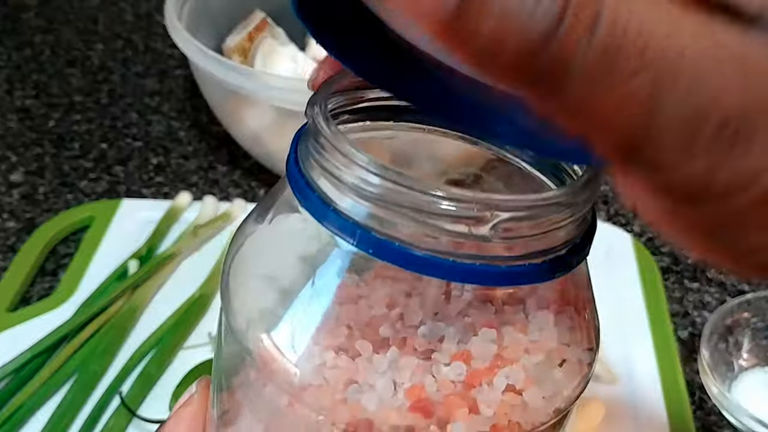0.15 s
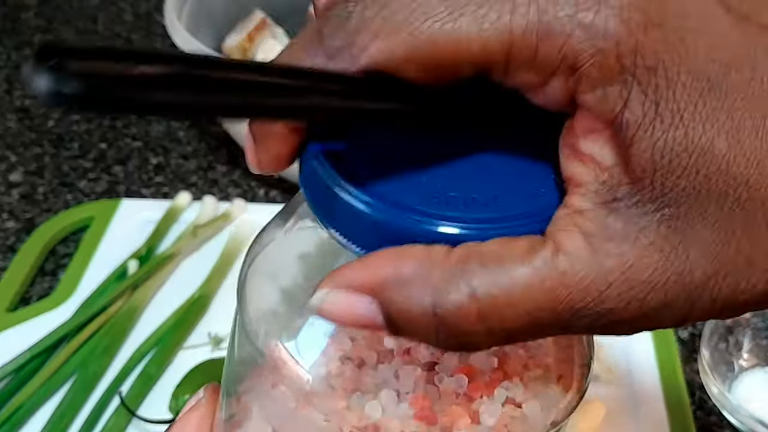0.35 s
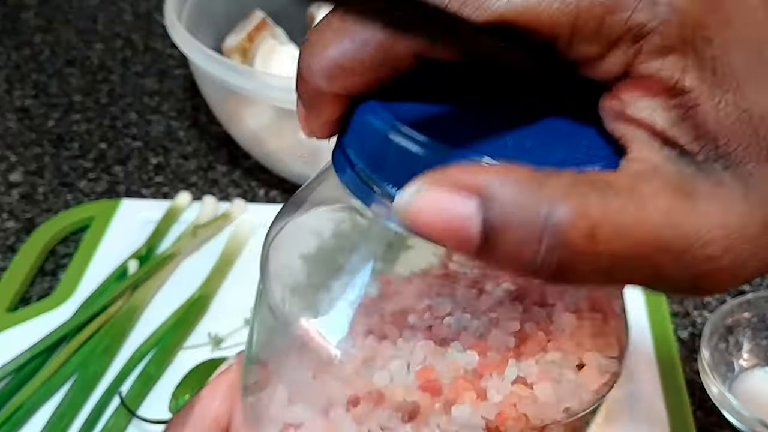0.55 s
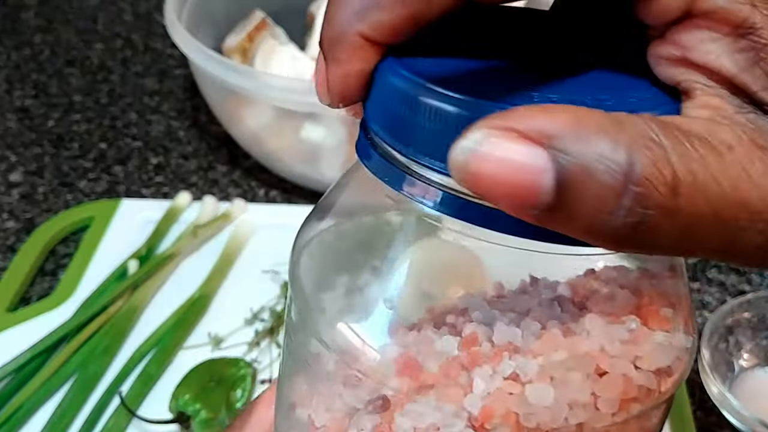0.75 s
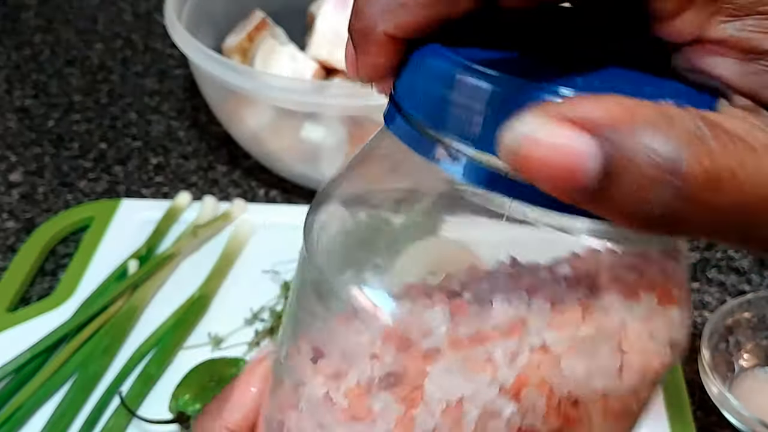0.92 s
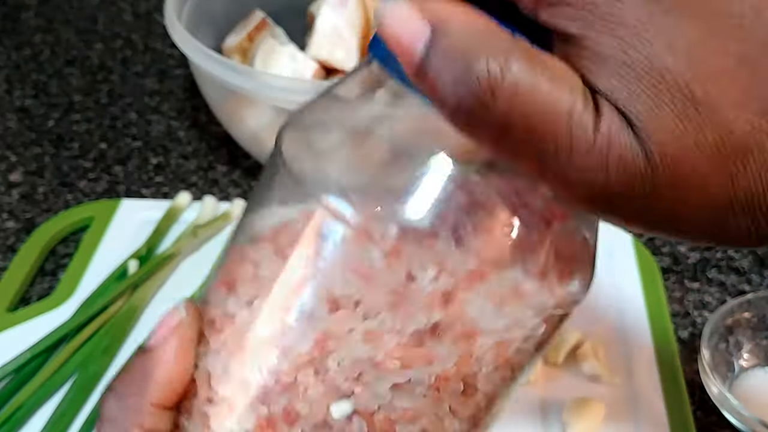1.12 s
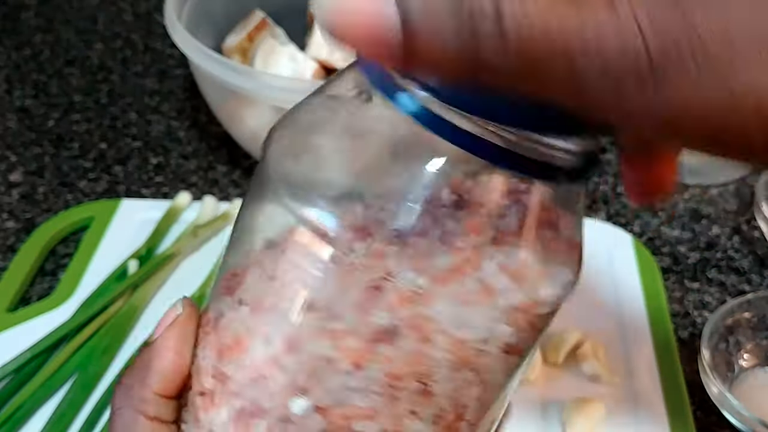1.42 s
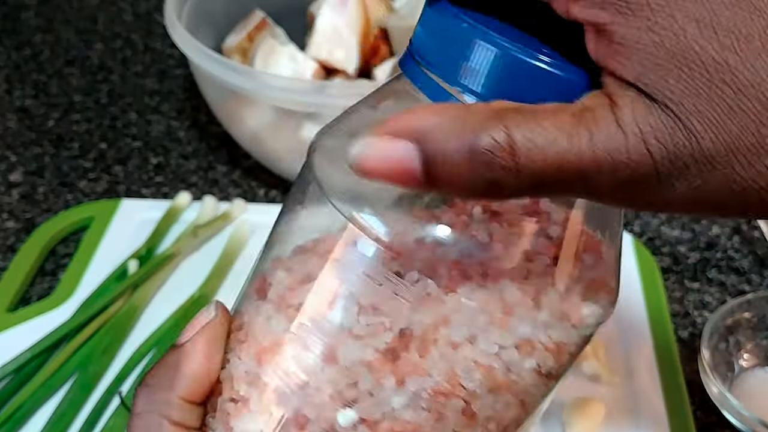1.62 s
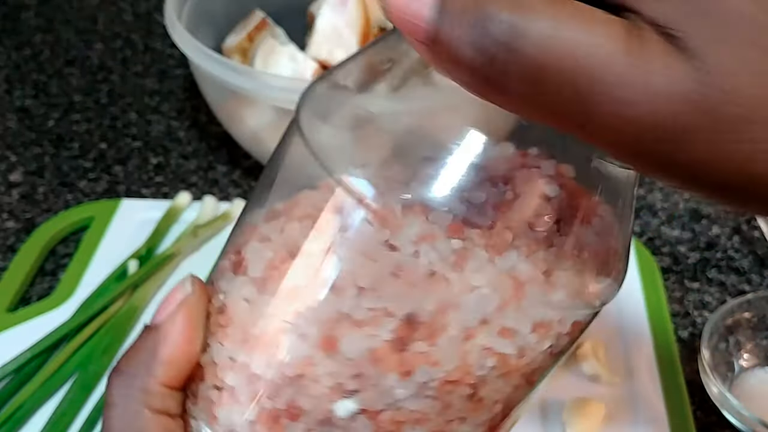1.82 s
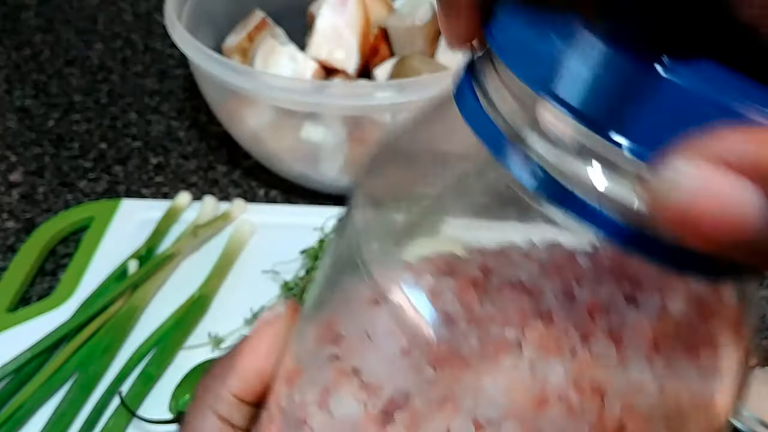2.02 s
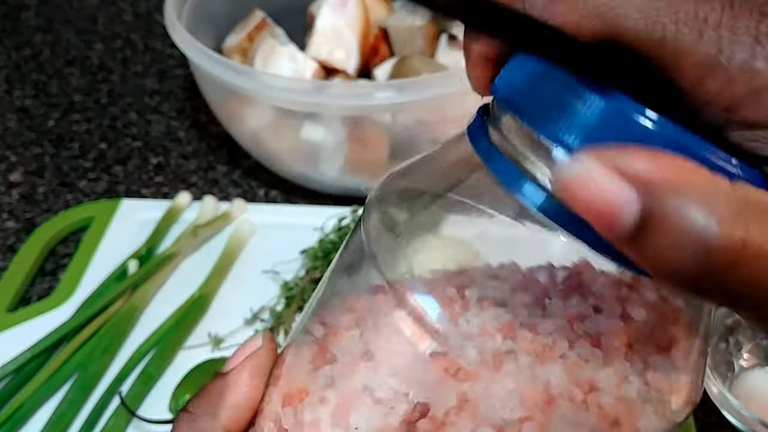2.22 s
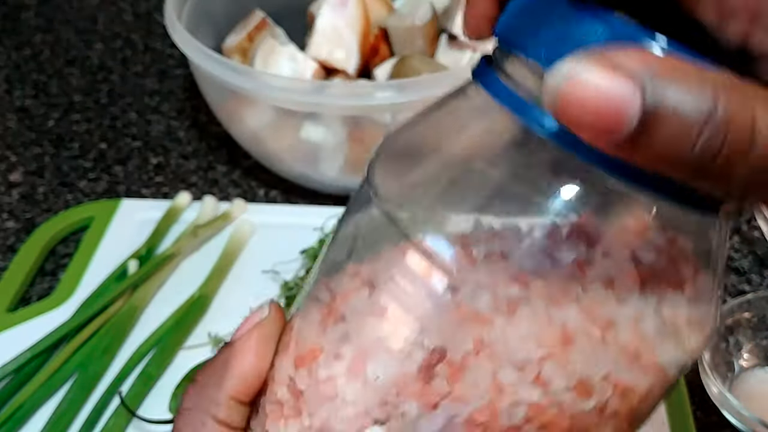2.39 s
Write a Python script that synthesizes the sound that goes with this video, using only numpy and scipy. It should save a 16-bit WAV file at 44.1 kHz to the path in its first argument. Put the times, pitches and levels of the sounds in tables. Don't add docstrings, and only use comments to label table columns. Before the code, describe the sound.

A plastic lid rocks and knocks onto a jar of coarse salt, lightly at first, then with harder hollow clacks and thread chatter as it is twisted; crystals tick and slide. Close phone microphone, small kitchen, low hum.

```python
import sys
import numpy as np
from scipy import signal
from scipy.fft import rfft, irfft, next_fast_len
from scipy.io import wavfile
from scipy.ndimage import uniform_filter1d, map_coordinates

SR = 44100
rng = np.random.default_rng(int(sys.argv[2]) if len(sys.argv) > 2 else 0)


def voltage_ratio(level):
    return 10 ** (np.asarray(level, float) / 20)


def waveform_to_disk(signal):
    frames = np.transpose(np.atleast_2d(signal))
    scaled = np.clip(frames, -1, 1) * 32767
    samples = np.round(scaled).astype(np.int16)
    wavfile.write(sys.argv[1], SR, samples)


N = 112454


def unit(x):
    return x / np.sqrt(np.mean(x ** 2) + 1e-20)


def along(points, hz):
    f, v = np.transpose(points)
    return np.interp(np.log(hz + 1), np.log(f + 1), v)


def wobble(rate_hz):
    knots = rng.standard_normal(int(N * rate_hz / SR) + 4)
    return map_coordinates(knots, [np.arange(N) * rate_hz / SR])


def filtered(x, response):
    n = x.shape[-1]
    m = next_fast_len(n + 8192)
    return irfft(rfft(x, m) * response(np.fft.rfftfreq(m, 1 / SR)), m)[..., :n]


def peak(f, hz, width_hz):
    return 1j * f * width_hz / (hz * hz - f * f + 1j * f * width_hz)


# f/Hz, correlation [-1..1]
LIKENESS = [(40, 0.8), (150, 0.88), (400, 0.98), (800, 0.057), (2500, 0.19), (8000, 0.042)]


def spread(pair, colour):
    def mid_side(hz):
        angle = np.arccos(np.clip(along(LIKENESS, hz), -1, 1)) / 2
        return voltage_ratio(along(colour, hz)) * [np.cos(angle), np.sin(angle)]

    mid, side = filtered(pair, mid_side)
    return np.array([mid + side, mid - side])


# f/Hz, level/dB [per Hz]
RUMBLE_COLOUR = [(15, -69), (25, -10.5), (108, -5.5), (181, -9.5), (214, -2), (281, -11.5), (453, -11),
                 (785, -26), (2000, -40), (2600, -77), (4400, -120)]


def hum():
    t = np.arange(N) / SR
    rumble = unit(spread(rng.standard_normal((2, N)), RUMBLE_COLOUR)) * voltage_ratio(-43 + 2.2 * wobble(8.4))
    air = filtered(rng.standard_normal((2, N)), lambda f: f > 11500) * voltage_ratio(-61 + 2.5 * wobble(9))
    hiss = voltage_ratio(-84) * rng.standard_normal((2, N))
    mains = voltage_ratio(-47.5 + 1.3 * wobble(13.8)) * np.sin(2 * np.pi * 120 * t)
    return rumble + air + hiss + mains


# f/Hz, t60/s
KITCHEN_T60 = [(150, 0.21), (1000, 0.28), (4000, 0.23), (10000, 0.22)]


def kitchen(x):
    wall_delay_s, room_low_db = 0.004, 2
    late, hop = round(wall_delay_s * SR), SR // 8
    out = np.zeros((2, N + 2 * SR))
    for start in range(0, N, hop):
        hz, t, z = signal.stft(rng.standard_normal((2, SR // 2)), SR, nperseg=256)
        decay = voltage_ratio(-60 * t / along(KITCHEN_T60, hz)[:, None])
        tail = signal.istft(z * decay, SR, nperseg=256)[1]
        tail = spread(tail, [(500, room_low_db), (1500, 0)])
        tail = tail / np.linalg.norm(tail[0])
        wet = signal.fftconvolve(x[None, start:start + hop], tail, axes=1)
        out[:, start + late:][:, :wet.shape[1]] += wet
    return out[:, :N]


# t/s, level/dB
FLOW_LEVEL = [(0, -59), (.12, -46), (.19, -50), (.22, -79), (.5, -65), (.56, -53.5), (.64, -44.5),
              (.81, -58.5), (.9, -45), (1.15, -36), (1.3, -57.5), (1.43, -43.5), (1.6, -38), (1.67, -59.5),
              (2.22, -59), (2.3, -64.5), (2.37, -61), (2.44, -65.5)]
# t/s, length/s, level/dB
HEAP_SLIDES = [
    (0.154, 0.025, -55),
    (0.725, 0.054, -38.5),
    (1.323, 0.017, -50),
    (1.497, 0.051, -25),
    (2.465, 0.052, -46),
]
# f/Hz, level/dB
SALT_SPECTRUM = [(500, -17), (1500, -11), (3000, 1), (5000, 6), (9000, -3), (12000, -3), (16000, 2)]


def salt():
    grains_per_s, grain_spread_db, touch_s = 720, 3, 0.00026
    edge_s, fall_s, sag_db_per_s = 0.011, 0.0023, 74
    t = np.arange(N) / SR
    flow = voltage_ratio(np.interp(t, *np.transpose(FLOW_LEVEL)) - 1 + 3 * wobble(24.24))
    for s, length_s, db in HEAP_SLIDES:
        level = voltage_ratio(db - sag_db_per_s * np.clip(t - s, 0, 1) + 2.5 * wobble(130))
        onset = np.clip((t - s) / edge_s, 0, 1)
        fall = np.exp(-np.clip(t - s - length_s, 0, 1) / fall_s)
        flow = flow + level * onset * fall
    chance, size = rng.random(N), rng.exponential(size=N)
    hits = (chance < grains_per_s / SR) * voltage_ratio(grain_spread_db * size)
    touch = signal.fftconvolve(hits, np.exp(-np.arange(200) / SR / touch_s))[:N]
    hush = voltage_ratio(1) * rng.standard_normal((2, N))
    grains = unit(touch * rng.standard_normal((2, N))) + hush
    return flow * unit(spread(grains, SALT_SPECTRUM))


# t/s, peak level/dB, centre f/Hz, t60/s
WALL_TICKS = [(.0065, -29, 4960, .02), (.028, -42, 7900, 0.019), (0.0645, -30.5, 7000, 0.019),
              (.0848, -31.5, 6000, .02), (0.0968, -31.5, 3960, .04), (.1045, -32, 6030, .03),
              (.18, -29.5, 8040, 0.018), (.3147, -33, 3000, 0.019), (0.537, -42.5, 6250, 0.048),
              (0.6709, -22, 6900, .012), (0.7036, -32.5, 5000, 0.041), (0.7441, -26.5, 5470, 0.036),
              (.763, -27, 4540, .05), (0.8315, -39, 5000, .015), (0.845, -30, 1500, 0.022),
              (1.0338, -23, 3000, 0.014), (1.092, -15, 1000, 0.018), (1.149, -26, 4040, .015),
              (1.1643, -20, 2170, 0.018), (1.1724, -26.5, 1400, 0.0087), (1.332, -27, 1500, 0.0086),
              (1.3435, -22, 4700, 0.0069), (1.373, -31, 1500, .01), (1.74, -28, 2220, 0.045),
              (1.3985, -27, 2200, 0.013), (1.432, -27.5, 1790, 0.025), (1.503, -20, 6940, 0.034),
              (1.5105, -10.5, 8400, 0.033), (1.5185, -14, 7000, 0.027), (1.529, -22, 7000, .03),
              (1.539, -23, 5940, 0.016), (1.547, -36, 4950, 0.018), (1.566, -28, 4960, 0.023),
              (1.579, -34, 7000, .02), (1.6978, -33, 3000, .02), (1.703, -48, 4000, 0.028),
              (1.8482, -21.5, 1500, 0.029), (1.8587, 2.5, 2010, 0.0085), (1.9886, -4.5, 2370, 0.022),
              (1.9931, -7.5, 4100, 0.01), (2.1679, -15.5, 1209, 0.035), (2.27, -53, 5500, .05),
              (2.3355, -45, 7000, 0.046), (2.375, -57, 7430, 0.065)]


def ticks():
    width, rise_s, air_db = 0.95, 0.00042, -11
    out, t = np.zeros((2, N + SR)), np.arange(SR // 8) / SR
    for s, db, hz, t60 in WALL_TICKS:
        def spot(f):
            return peak(f, hz, width * hz) ** 2 + voltage_ratio(air_db) * np.clip(f / hz - 1, 0, 1)

        envelope = voltage_ratio(-60 * t / t60) * (1 - np.exp(-t / rise_s))
        crack = envelope * filtered(rng.standard_normal((2, len(t))), spot)
        out[:, round(s * SR):][:, :len(t)] += voltage_ratio(db - 1.0) * crack / np.abs(crack).max()
    return spread(out[:, :N], [(100, 0), (16000, 0)])


# t/s, peak level/dB, tilt [dB/octave], t60/s
SNAP_EVENTS = [(0.0, -32, 7, 0.11), (0.0648, -42, 6.5, 0.026), (0.135, -32, -3.5, 0.14),
               (0.2534, -33.5, -3, 0.044), (0.3044, -26.5, -1.5, 0.16), (0.3495, -15, 1.5, 0.066),
               (0.596, -37.5, 3.5, 0.24), (0.671, -38, 8, 0.071), (0.835, -31, 6.5, 0.061),
               (0.8508, -17.5, 4, 0.047), (0.9804, -31.5, 0.2, 0.26), (1.0237, -6, 0.5, 0.081),
               (1.061, -5.5, -1, 0.039), (1.1718, -18, -10.5, 0.017), (1.1813, -10, 0.1, 0.04),
               (1.2753, -20.5, -3, 0.046), (1.3326, -26, -0.5, 0.1), (1.3726, -23, -5.2, 0.067),
               (1.4536, -26, 2.5, 0.056), (1.4763, -22.5, 4, 0.057), (1.6027, -39, 1.5, 0.047),
               (1.7376, -30, -8.5, 0.11), (1.855, -11.5, 4, 0.093), (1.984, -7.5, 0.5, 0.2),
               (2.0848, -20, -0.5, 0.1), (2.167, -6.5, -6, 0.023), (2.4047, -43, -8.5, 0.065),
               (2.4817, -31, 1.5, 0.3)]
# f/Hz, level/dB
SNAP_SPECTRUM = [(300, -3), (600, -0.5), (1000, 8), (1500, 8), (3000, 9.5), (7000, 3.5), (11000, 0),
                 (16000, 5.5)]


def snaps():
    snap_db, rise_s, slip_swing_db, tilt_around_hz = -10.5, 0.00075, 3, 3000
    out, t = np.zeros((2, N + SR)), np.arange(SR // 4) / SR
    for s, db, tilt_db, t60 in SNAP_EVENTS:
        swing = unit(uniform_filter1d(rng.standard_normal(len(t)), size=40))
        slips = voltage_ratio(slip_swing_db * swing) * rng.standard_normal((2, len(t)))
        burst = slips * voltage_ratio(db + snap_db - 60 * t / t60) * (1 - np.exp(-t / rise_s)) ** 2
        tilted = filtered(burst, lambda f: voltage_ratio(tilt_db * np.log2(np.clip(f, 600, 9000) / tilt_around_hz)))
        out[:, round(s * SR):][:, :len(t)] += tilted
    return spread(out[:, :N], SNAP_SPECTRUM)


PING_TIMES = [.005, .098, 1.165, 1.2755, 1.335, 1.373, 1.398, 1.432, 1.477, 1.855, 1.856, 1.857, 1.986,
              2.484, 1.859, .006]
PING_PITCHES = [2550, 2540, 2330, 2320, 2330, 1150, 1520, 1550, 1750, 336, 92, 970, 608, 4180, 2105, 4800]
# peak level/dB, t60/s
PING_DECAYS = [(-30.5, 0.023), (-31.5, 0.015), (-26, 0.018), (-17.5, 0.033), (-33.5, 0.25), (-29, 0.052),
               (-26, .015), (-32, 0.021), (-33, 0.018), (-13.5, 0.15), (-15, 0.085), (-10, 0.024),
               (-12, 0.084), (-32.5, 0.14), (-24, 0.18), (-23.5, 0.013)]


def pings():
    rise_s, drift_rad_per_khz = 0.00075, 0.05
    out, t = np.zeros(N + SR), np.arange(SR // 4) / SR
    for s, hz, (db, t60) in zip(PING_TIMES, PING_PITCHES, PING_DECAYS):
        drift = drift_rad_per_khz * hz / 1000 * np.cumsum(rng.standard_normal(len(t)))
        envelope = voltage_ratio(db - 60 * t / t60) * (1 - np.exp(-t / rise_s))
        out[round(s * SR):][:len(t)] += envelope * np.sin(2 * np.pi * hz * t + drift)
    return out[:N]


# t/s, length/s, level/dB, first f/Hz, last f/Hz
AIR_PUFFS = [
    (.135, 0.012, -24, 418, 387),
    (.147, 0.0078, -23, 428, 413),
    (0.17, 0.035, -35.5, 390, 400),
    (0.256, 0.017, -23, 360, 325),
    (0.278, 0.032, -26.5, 310, 347),
    (0.307, 0.021, -20.5, 312, 295),
    (0.33, 0.019, -23.5, 273, 255),
]


def puffs():
    overtone_db, hush_db, swell_power = -18, -16, 0.6
    out, t = np.zeros(N + SR), np.arange(SR // 4) / SR
    for s, length_s, db, first_hz, last_hz in AIR_PUFFS:
        u = np.clip(t / length_s, 0, 1)
        noise = rng.standard_normal(len(t))
        hush = unit(filtered(noise, lambda f: peak(f, 1.18 * first_hz, 0.86 * first_hz) ** 2))
        phase = 2 * np.pi * np.cumsum(first_hz + (last_hz - first_hz) * u) / SR
        tone = np.sin(phase) + voltage_ratio(overtone_db) * np.sin(2 * phase) + voltage_ratio(hush_db) * hush
        swell = np.abs(np.sin(np.pi * u)) ** swell_power * (u < 1)
        out[round(s * SR):][:len(t)] += voltage_ratio(db) * swell * tone
    return out[:N]


def rocking():
    return (puffs() + pings()) * voltage_ratio(1.5 * wobble(150))


# t/s, peak level/dB, air f/Hz, t60/s
LID_KNOCKS = [(0.353, -16.5, 248, 0.071), (0.356, -20.5, 328, 0.068), (0.592, -20.5, 280, 0.037),
              (0.847, -11.5, 363, 0.035), (0.854, -13.5, 371, 0.025), (1.0229, -2.5, 441, 0.03),
              (1.039, -19.5, 493, 0.071), (1.06, -12.5, 357, 0.035), (1.088, -23.5, 470, 0.025),
              (1.171, -10, 540, 0.012), (1.182, -15.5, 260, 0.045), (1.207, -25, 508, 0.023),
              (1.3296, -17.5, 395, 0.04), (1.348, -14.5, 322, 0.021), (1.37, -7, 306, 0.012),
              (1.735, -18.5, 290, 0.051), (1.852, -11.5, 353, 0.063), (1.983, -1, 346, 0.041),
              (1.991, -20, 302, 0.033), (2.014, -22.5, 324, 0.083), (2.084, -11, 258, 0.022),
              (2.102, -17, 246, 0.027), (2.164, -1, 322, 0.023), (2.184, -20, 317, 0.057),
              (2.403, -28.5, 233, 0.072)]
# f/Hz, width/Hz, level/dB
WALL_MODES = [(95, 60, -7.5), (201, 170, -7), (623, 27, -15), (950, 1800, -17), (1450, 300, -79)]


def knocks():
    knock_db, wall_db, thud_db = -2, 33, -2.5
    rise_s, late_s, contact_hz = 0.00071, 0.0012, 1500
    air, blows, t = np.zeros(N + SR), np.zeros(N + SR), np.arange(SR // 4) / SR
    for s, db, hz, t60 in LID_KNOCKS:
        thud = filtered(rng.standard_normal(len(t)), lambda f: peak(f, hz, 1.004 * hz) ** 2)
        ring = np.sin(2 * np.pi * hz * t) + voltage_ratio(thud_db) * unit(thud)
        envelope = voltage_ratio(db + knock_db - 60 * t / t60) * (1 - np.exp(-t / rise_s)) ** 2
        air[round((s + late_s) * SR):][:len(t)] -= envelope * ring
        blows[round((s + late_s + rise_s) * SR)] = -voltage_ratio(db + wall_db)

    def wall(f):
        modes = sum((-1) ** k * voltage_ratio(db) * peak(f, hz, width_hz)
                    for k, (hz, width_hz, db) in enumerate(WALL_MODES))
        return modes / (1 + 1j * f / contact_hz) ** 2

    return (air + filtered(blows, wall))[:N] * np.ones((2, 1))


def scene():
    jar = knocks() + snaps() + salt() + ticks()
    lid = rocking()
    echo = voltage_ratio(-6.5) * kitchen(jar[0] + voltage_ratio(-9) * lid)
    return jar + lid + echo + hum()


def low_pass(x):
    return signal.sosfilt(signal.butter(12, 16440, fs=SR, output="sos"), x)


# f/Hz, level/dB
LEFT_PORT = [(35, -16.5), (80, 3.5), (1500, 2), (6500, 3.5), (7800, 12), (8800, 3), (10500, -20),
             (11800, -16), (15500, -18.5)]
# f/Hz, level/dB
RIGHT_PORT = [(35, -10), (80, 0), (1500, 0.5), (6500, 1.5), (7800, 4), (8800, -3), (10500, -22.5),
              (11800, -16), (15500, -20.5)]


def record(dry):
    left_leads_s, low_cut_hz, top_hz = 0.00009, 24.4, 16000
    clip_top, clip_hard = 1, 6

    def ports(hz):
        colour = voltage_ratio([along(LEFT_PORT, hz), along(RIGHT_PORT, hz)])
        lead = np.exp(1j * np.pi * hz * left_leads_s * np.array([[1], [-1]]))
        return colour * lead * (hz < top_hz) / (1 + (low_cut_hz / (hz + 1)) ** 4)

    x = filtered(dry, ports)
    x = x / (1 + np.abs(x / clip_top) ** clip_hard) ** (1 / clip_hard)
    return low_pass(x)


dry = scene()
out = record(dry)
waveform_to_disk(out)
```